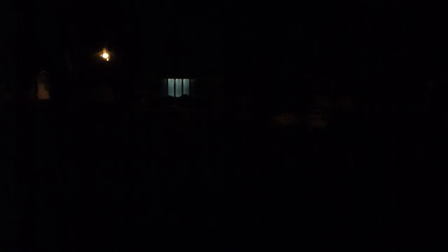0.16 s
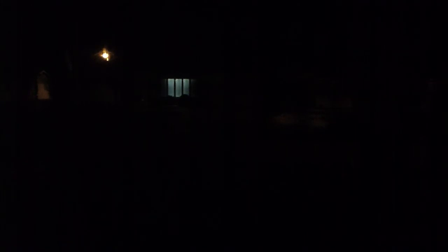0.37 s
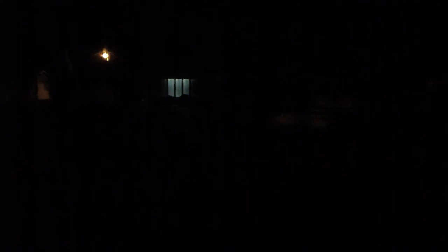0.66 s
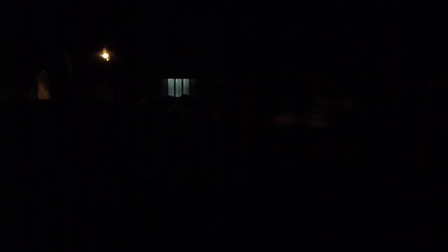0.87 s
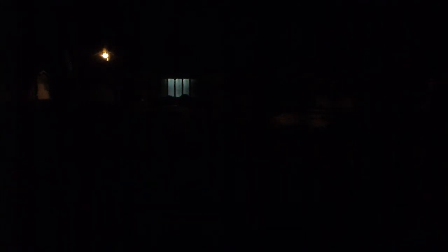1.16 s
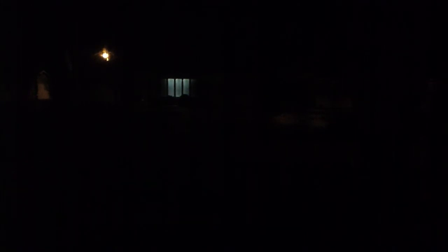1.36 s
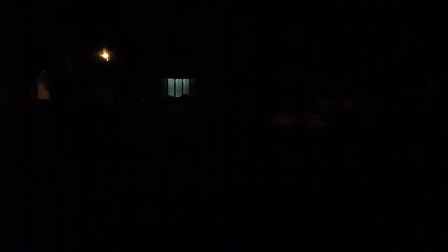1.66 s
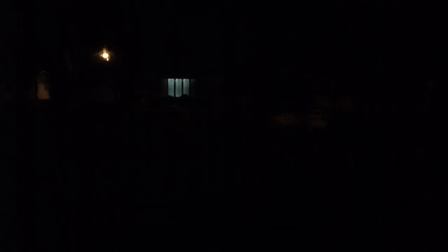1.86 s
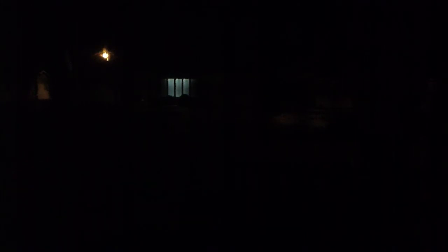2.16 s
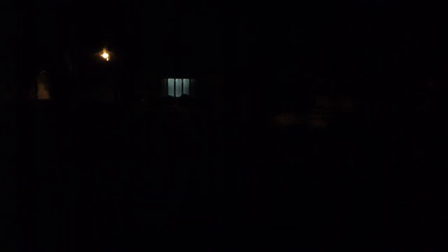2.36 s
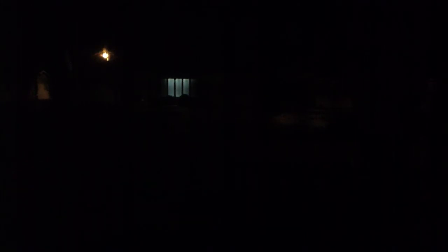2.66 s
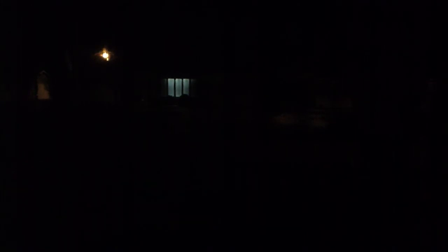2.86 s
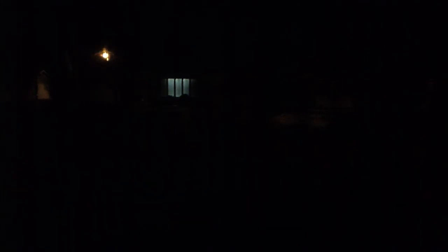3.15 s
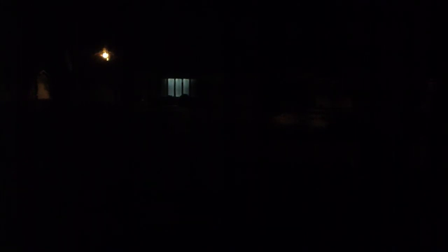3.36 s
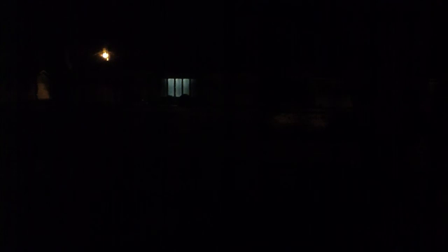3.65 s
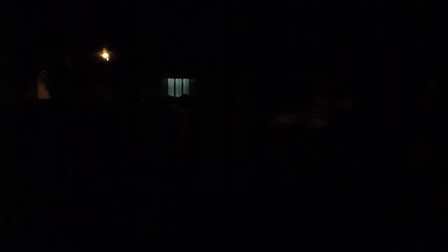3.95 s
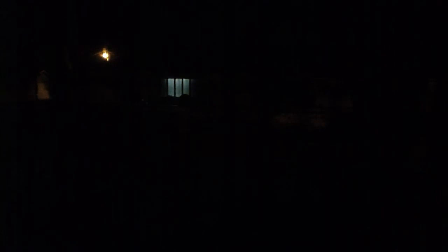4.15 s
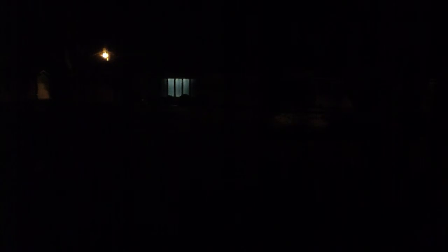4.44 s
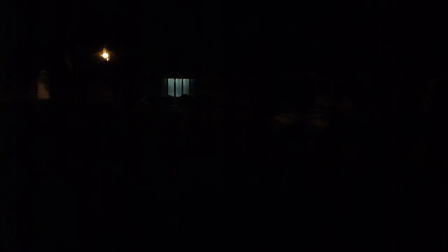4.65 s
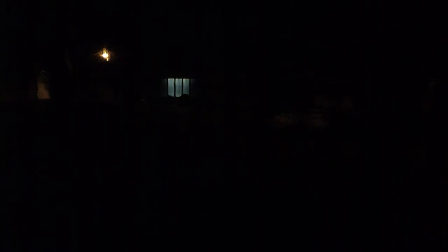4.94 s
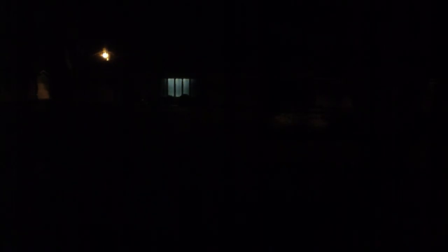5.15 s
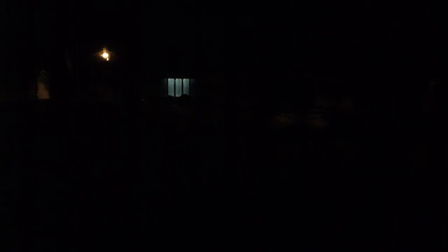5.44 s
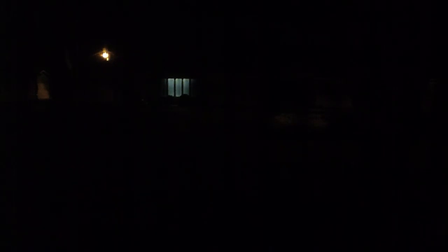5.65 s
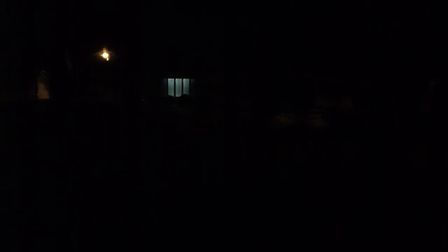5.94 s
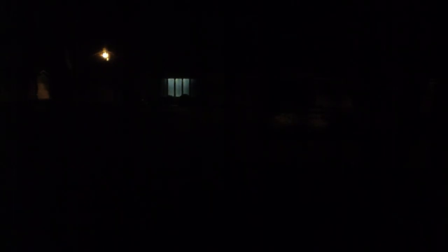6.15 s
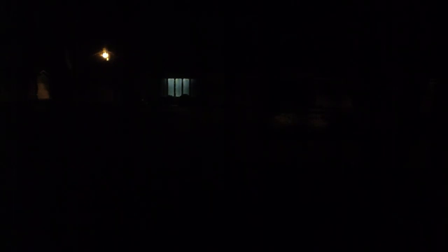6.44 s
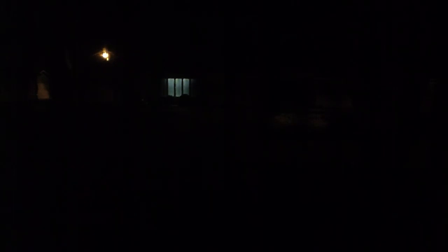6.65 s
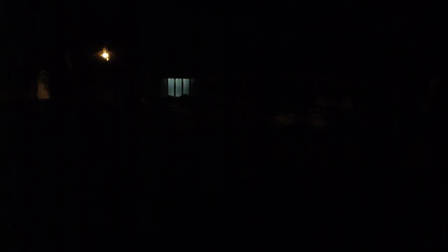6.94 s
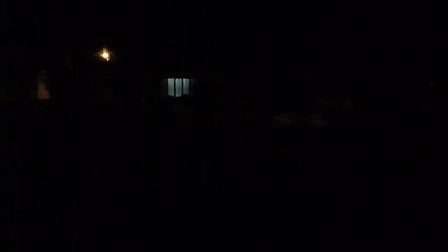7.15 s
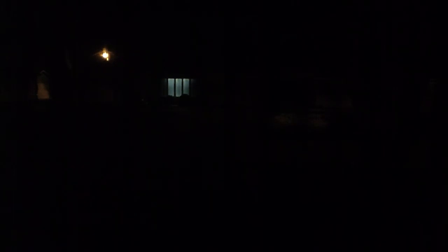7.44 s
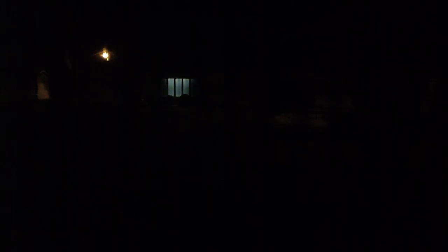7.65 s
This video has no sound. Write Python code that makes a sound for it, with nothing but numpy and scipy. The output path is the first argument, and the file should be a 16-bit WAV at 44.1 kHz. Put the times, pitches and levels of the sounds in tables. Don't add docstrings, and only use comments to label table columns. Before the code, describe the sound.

Distant engines rumble softly and tyres hiss faintly, one car receding at the start. An owl some way off outdoors starts with weaker calls, then settles into a steady run of round, hollow hoots, each rising quickly and sagging, with dulled overtones and light yard echo heard through a window. A longer, descending hoot closes the run. Then a tiny scrape and a sharp plastic click, very close to the small microphone.

```python
import sys
import numpy as np
from scipy import signal
from scipy.fft import rfft, irfft, next_fast_len
from scipy.io import wavfile
from scipy.ndimage import uniform_filter1d, map_coordinates

SR = 44100
rng = np.random.default_rng(int(sys.argv[2]) if len(sys.argv) > 2 else 0)


def materialize(psi):
    bounded = np.clip(np.atleast_2d(psi).T, -1, 1)
    quanta = np.round(bounded * 32767).astype(np.int16)
    wavfile.write(sys.argv[1], SR, quanta)


def volts_from_db(level):
    exponent = np.asarray(level, float) / 20
    return 10 ** exponent


N = 343228

# time in seconds, level in dB.
TRAFFIC_SWELL = [(0, 2), (.55, -2.5), (1.15, 2), (1.7, -0.5), (2.4, -1), (3.2, 1.1), (4.4, 0.5),
                 (5.6, -0.8), (6.6, 0.53), (7.0, -1.5), (7.4, 1.5), (7.78, -4.5)]
# frequency in Hz, level in dB per Hz.
RUMBLE_SPECTRUM = [(26, -70), (45, -32), (70, -16), (83, -7.5), (104, 1), (189, -5), (301, -6.5),
                   (400, -19), (520, -49), (880, -120)]
# frequency in Hz, level in dB per Hz.
ROAD_SPECTRUM = [(120, -19.5), (200, -9.5), (300, -7), (329, -6.5), (431, -8), (461, -11.5), (514, -7),
                 (564, -14.5), (685, -14), (1500, -22), (1950, -42), (3300, -120)]
# frequency in Hz, level in dB per Hz.
TYRE_SPECTRUM = [(710, -14.5), (1200, 1), (1290, -7), (1730, -6), (2040, -3), (2580, -12.5), (3500, -18.5),
                 (4550, -31), (7700, -120)]
# time in seconds, half length in seconds, lift in dB.
PASSING_CARS = [
    (0.147, 0.059, 4),
    (1.75, .1, 2.5),
    (3.77, 0.12, 5),
]
# frequency in Hz, level in dB per Hz.
MIC_HISS_SPECTRUM = [(1470, -21), (2500, -6), (4800, -5), (14600, -3.5), (15300, -3)]
# time in seconds, level in dB.
HUM_LEVEL = [(0.0, -60), (7.78, -65.5)]
# time in seconds, level in dB.
SLIDE_LEVEL = [
    (7.658, -80),
    (7.669, -55),
    (7.69, -61),
    (7.71, -66),
    (7.725, -76),
]
# frequency in Hz, level in dB.
FINGERTIP_SPECTRUM = [(400, -40), (900, 3.5), (2200, -12.5), (4000, -12.5), (6000, -25)]
# time in seconds, level in dB.
BUTTON_CLICK = (7.7274, -41.5)
# frequency in Hz, level in dB.
CRACK_SPECTRUM = [(500, -31), (1200, -7), (2200, -10), (3300, 6.5), (4000, 1.5), (6000, -4), (7500, -10),
                  (14500, 0), (16500, -30)]
# frequency in Hz, level in dB, time to fall 60 dB in seconds.
CASE_MODES = [(1100, -20, 0.058), (2000, -4, 0.057), (2310, -6, 0.091), (3320, -1, .025), (3600, -14, 0.03),
              (4600, -16, 0.065), (5650, 2, 0.02), (9540, 2, 0.0086), (14700, -8, .008)]
# frequency in Hz, level in dB.
PATH_LOSS = [(150, -26), (250, -2), (310, -8.5), (360, 0.5), (480, 0), (535, 2), (580, -7.5), (830, -9.5),
             (960, -16), (1150, -23), (1600, -10), (2200, -6.5), (3000, -23)]
# frequency in Hz, width in Hz, level in dB.
ROOM_MODES = [(352, 93, -17), (477.7, 38, 0), (541.4, 14.2, 1.5), (617, 28, 8.5), (708, 43, -7),
              (841, 41, -5)]
# delay in seconds, level in dB.
NEAR_REFLECTIONS = [(.0087, 0), (.021, -19), (.034, -11)]
# delay in seconds, level in dB.
HOUSE_ECHOES = [(.14, -21), (.165, -24), (.212, -23), (.3, -39)]
# start in seconds, rise in seconds, hold in seconds, top pitch in Hz, level in dB.
SHORT_HOOTS = [(1.169, 0.07, .058, 555, -45.5), (1.476, 0.053, 0.046, 568, -37.5),
               (1.847, .058, .03, 432.1, -41), (2.379, 0.067, 0.076, 565, -34),
               (2.691, .04, .094, 590, -31.5), (3.025, .064, .028, 542, -32),
               (3.471, .07, .037, 560, -32.5), (3.891, .072, .045, 558, -32),
               (4.296, .068, .051, 560, -32.5), (4.703, .052, .065, 561, -32.5),
               (5.097, .052, .063, 560, -32), (5.495, .053, .055, 557, -32),
               (5.902, .051, .059, 555, -32.5), (6.31, .052, 0.054, 551, -32)]
# start in seconds, rise in seconds, hold in seconds, top pitch in Hz, level in dB.
CLOSING_HOOT = (6.508, .069, .172, 563, -32)
# time in seconds, pitch in Hz, level in dB.
FAINT_MURMUR = [
    (1.995, 253.6, -55.5),
    (2.025, 273.4, -52.5),
    (2.065, 300, -48),
    (2.105, 290, -65),
]
# level in dB, gain in dB when the membrane is slack.
OVERTONE_LEVELS = [(2, 1.5), (-13, 17), (-19, 16.5), (-21.5, -14)]

REST_HZ = 237.8
SLACK_DB, LEAP_DB = -41, -2.5


def unit(x):
    return x / np.sqrt(np.mean(x ** 2) + 1e-20)


def along(points, hz):
    f, v = np.transpose(points)
    return np.interp(np.log(hz + 1), np.log(f + 1), v)


def curves(rows):
    s, *cols = np.transpose(rows)
    return [np.interp(np.arange(N) / SR, s, c) for c in cols]


def wobble(rate):
    knots = rng.standard_normal(int(N * rate / SR) + 4)
    return map_coordinates(knots, [np.arange(N) * rate / SR])


def filtered(x, response):
    m = next_fast_len(N + SR)
    return irfft(rfft(x, m) * response(np.fft.rfftfreq(m, 1 / SR)), m)[:N]


def rush(spectrum, patchy_db):
    z = signal.stft(rng.standard_normal(N), nperseg=1024)[2]
    field = uniform_filter1d(rng.standard_normal(z.shape), size=3, axis=0)
    field = uniform_filter1d(field, size=8, axis=1)
    noise = signal.istft(z * volts_from_db(patchy_db * unit(field)), nperseg=1024)[1][:N]
    return unit(filtered(noise, lambda hz: volts_from_db(along(spectrum, hz))))


def traffic():
    t = np.arange(N) / SR
    swell_db, = curves(TRAFFIC_SWELL)
    passing_db = 6.5 * np.exp(-t / 0.16)
    for s, half_s, db in PASSING_CARS:
        passing_db = passing_db + db * np.exp(-((t - s) / half_s) ** 2)
    rumble = volts_from_db(-60 + swell_db + 0.2 * wobble(4.26)) * rush(RUMBLE_SPECTRUM, patchy_db=-1.0)
    road = volts_from_db(-57 + 0.17 * swell_db + 0.22 * wobble(7)) * rush(ROAD_SPECTRUM, patchy_db=1.5)
    tyres = volts_from_db(-70.5 + passing_db + 0.66 * wobble(7.3)) * rush(TYRE_SPECTRUM, patchy_db=1)
    return rumble + road + tyres


def machine_hum():
    hz = 302 + 1.21 * wobble(8)
    level_db = curves(HUM_LEVEL)[0] + 1.03 * wobble(7.4)
    return volts_from_db(level_db) * np.sin(2 * np.pi * np.cumsum(hz) / SR)


def mic_hiss():
    return volts_from_db(-66.0) * rush(MIC_HISS_SPECTRUM, patchy_db=0.8)


def finger():
    t = np.arange(N) / SR
    click_s, click_db = BUTTON_CLICK
    slide_db = curves(SLIDE_LEVEL)[0] + 5.0 * wobble(250)
    slide = volts_from_db(slide_db) * rush(FINGERTIP_SPECTRUM, patchy_db=0.5) * (t < SLIDE_LEVEL[-1][0])
    since = np.clip(t - click_s, 0, None)
    ring = sum(volts_from_db(db - 60 * since / t60) * np.sin(2 * np.pi * hz * since) for hz, db, t60 in CASE_MODES)
    decay = volts_from_db(-60 * since / 0.0055) + volts_from_db(-13 - 60 * since / 0.04)
    crack = 2.3 * decay * rush(CRACK_SPECTRUM, patchy_db=-2.0)
    return slide + volts_from_db(click_db) * (t > click_s) * (0.45 * ring + crack)


def window(x):
    def response(hz):
        room = 0.36
        for mode_hz, width, db in ROOM_MODES:
            damping = 1j * hz * width
            room = room + volts_from_db(db) * damping / (mode_hz * mode_hz - hz * hz + damping)
        return volts_from_db(along(PATH_LOSS, hz)) * room
    return filtered(x, response)


def yard(x):
    t = np.arange(SR) / SR
    tail = rng.standard_normal(SR) * volts_from_db(-60 * t / 0.46) * (1 - np.exp(-(t / 0.071) ** 2))
    answer = volts_from_db(-12.5) * tail / np.linalg.norm(tail)
    for delay, db in NEAR_REFLECTIONS + HOUSE_ECHOES:
        answer[round(delay * SR)] += volts_from_db(db)
    echoes = signal.fftconvolve(x, answer)[:N]
    return x + filtered(echoes, lambda hz: 1 / (1 + (hz / 1200) ** 4))


def arch(start, rise, hold, top_hz, db, leave_db=-3):
    leap_s = 0.29 * rise
    leap_rate = 8500 * volts_from_db(0.8 * min(db + 31.5, 0))
    crest_s = min(0.045, 0.647 * hold)
    sag_s = max(crest_s, hold - 0.0441)
    held, slack_db, crest_db = start + rise, min(SLACK_DB, db + LEAP_DB), db - 1.5
    return [(start, REST_HZ, slack_db - 6.5),
            (start + leap_s, REST_HZ + leap_rate * leap_s, slack_db),
            (held - 0.02, 0.83 * top_hz, db - 3.5),
            (held, 0.97 * top_hz, db),
            (held + crest_s, top_hz, crest_db),
            (held + sag_s, top_hz, crest_db),
            (held + hold, 0.93 * top_hz, db + leave_db)]


def short_hoot(start, rise, hold, top_hz, db, wait):
    end = start + rise + hold + 0.03
    slack_db = min(SLACK_DB, db + LEAP_DB)
    cut_db = -9.5 * (wait < 0.36)
    drop = (end, REST_HZ + 0.23 * (top_hz - REST_HZ), slack_db + cut_db)
    trail = (end + 0.023, REST_HZ + 6, slack_db - 5 + 2 * cut_db)
    return arch(start, rise, hold, top_hz, db) + [drop, trail]


def long_hoot(start, rise, hold, top_hz, db):
    slip_hz, floor_hz, link_db = 424, 214, -49
    u = np.arange(0, 0.438, 1 / 64)
    glide_hz = floor_hz + (slip_hz - floor_hz) * np.exp(-u / 0.14)
    glide_db = db - 6.5 - 23.5 * u - 120 * u * u
    glide = [start + rise + hold + 0.03 + u, glide_hz, glide_db]
    link = [(start - 0.024, 225.5, link_db), (start, REST_HZ, link_db)]
    return link + arch(start, rise, hold, top_hz, db, leave_db=-1)[1:] + list(np.transpose(glide))


def owl():
    t = np.arange(N) / SR
    following = SHORT_HOOTS[1:] + [(np.inf,)]
    hoots = [short_hoot(*row, then[0] - row[0]) for row, then in zip(SHORT_HOOTS, following)]
    hoots += [FAINT_MURMUR, long_hoot(*CLOSING_HOOT)]
    pitch, db = curves(sorted(tuple(row) for hoot in hoots for row in hoot))
    sounding = sum((t > hoot[0][0]) & (t < hoot[-1][0]) for hoot in hoots) > 0
    pitch = uniform_filter1d(pitch, size=SR // 70)
    size = uniform_filter1d(volts_from_db(db) * sounding, size=SR // 120)

    slack = np.clip((550 - pitch) / 300, 0, 1)
    haste = np.clip(abs(np.gradient(pitch)) * SR / 6000, 0, 1) * slack
    shake = (0.002 + 0.012 * slack + 0.04 * haste) * wobble(90)
    phase = 2 * np.pi * np.cumsum(pitch * (1 + shake)) / SR
    tone = 0
    for k, (firm_db, gain_db) in enumerate(OVERTONE_LEVELS, 1):
        tone = tone + volts_from_db(firm_db + gain_db * slack) * np.sin(k * phase)
    puffs = 1 + np.sin(phase)
    breath = volts_from_db(-30.5 + 8.2 * slack + 10 * haste) * rng.standard_normal(N) * puffs
    flutter_db = (0.3 + slack + 1.5 * haste) * wobble(70)
    return size * volts_from_db(flutter_db) * (tone + breath)


def scene():
    night = filtered(traffic() + machine_hum() + mic_hiss(), lambda hz: hz < 15330)
    return (night + finger() + window(yard(owl())))[None]


def low_pass(x):
    return signal.sosfilt(signal.butter(12, 16260, fs=SR, output="sos"), x)


def record(dry):
    mix = filtered(dry[0], lambda hz: (hz < 16300) / (1 + (62 / (hz + 1)) ** 2.8))
    return low_pass(mix[None])


dry = scene()
out = record(dry)
materialize(out)
```